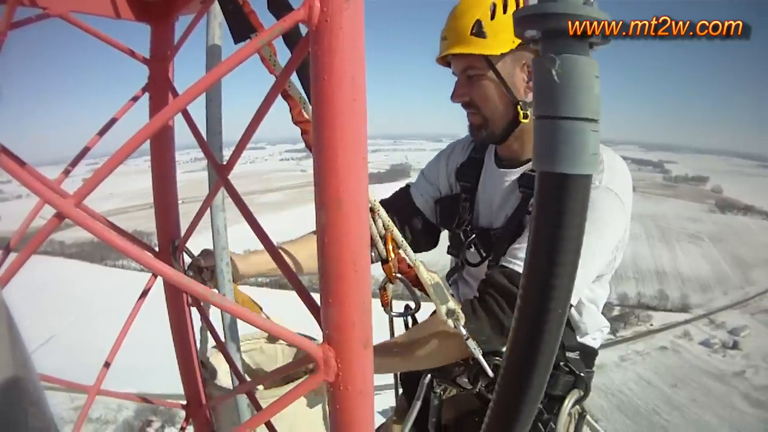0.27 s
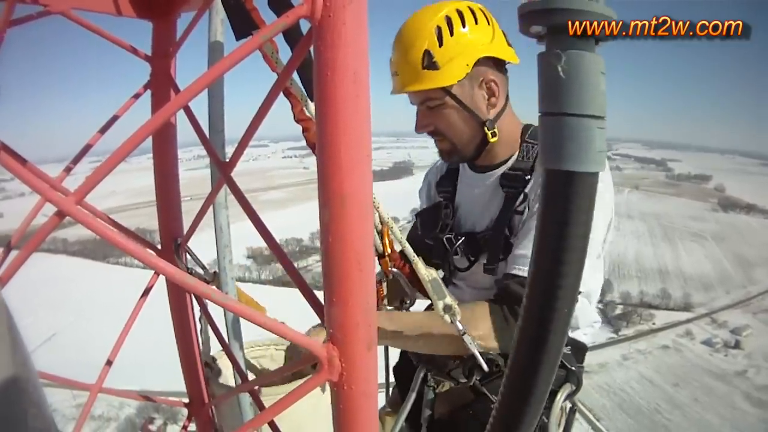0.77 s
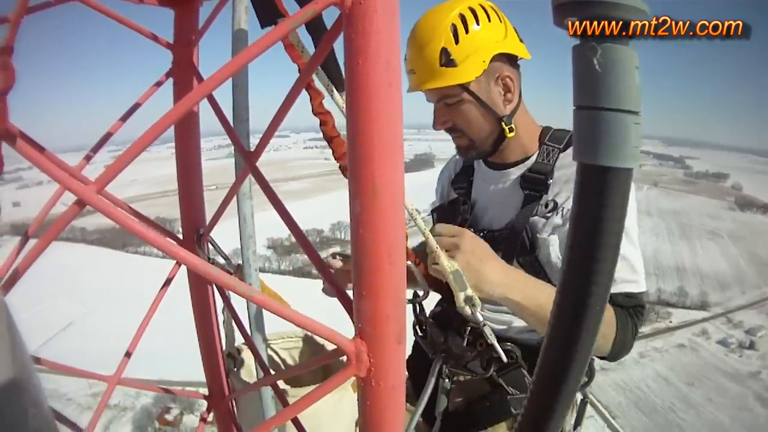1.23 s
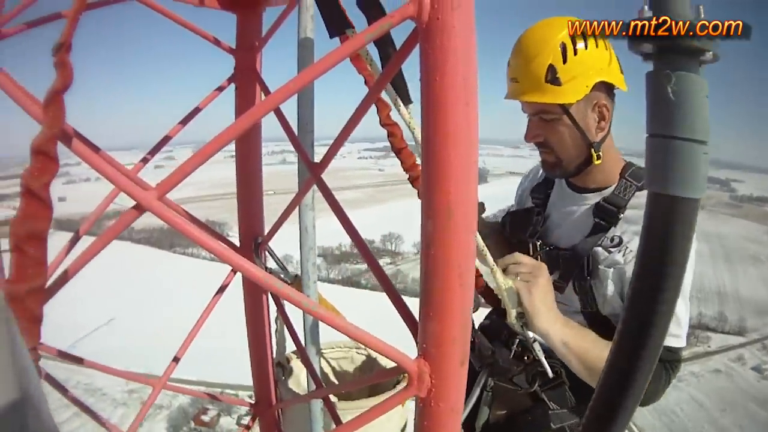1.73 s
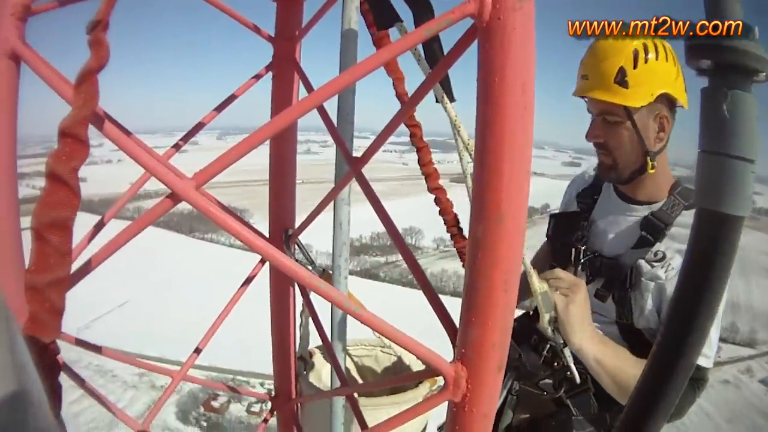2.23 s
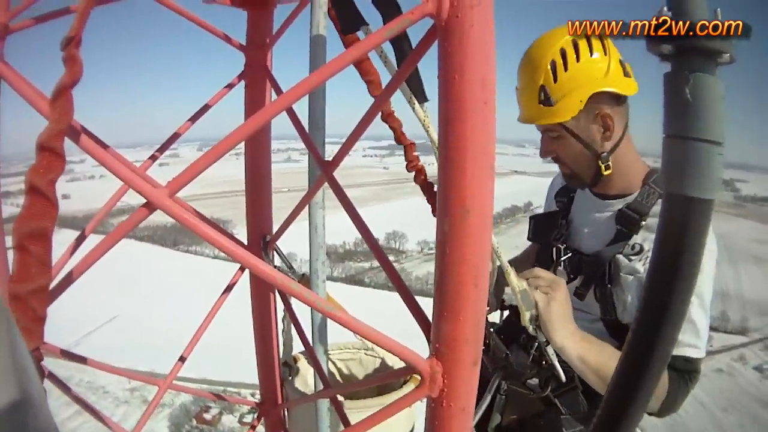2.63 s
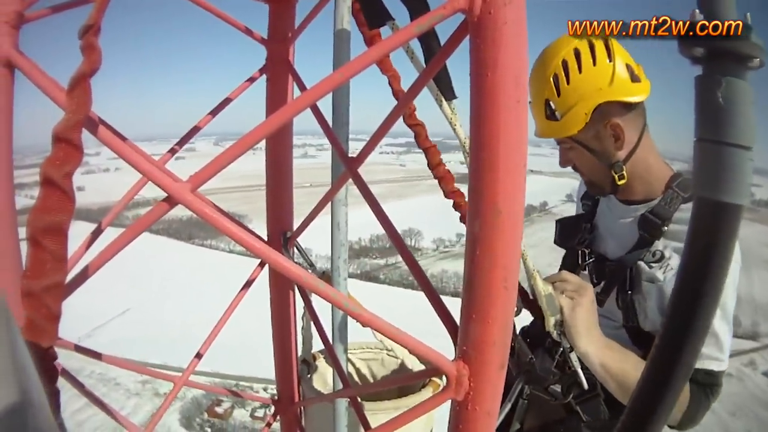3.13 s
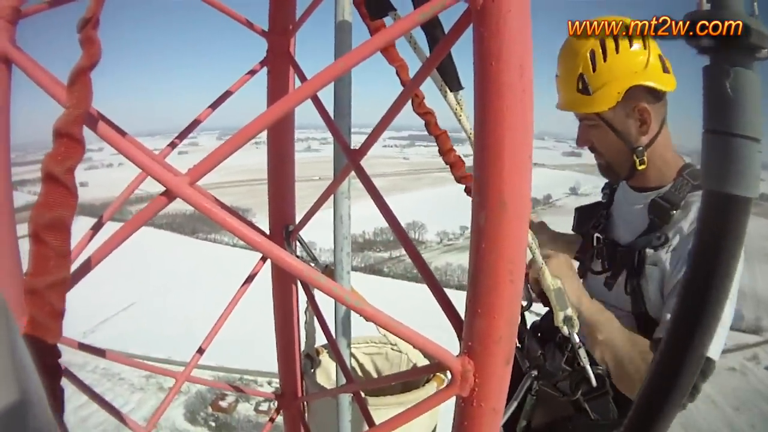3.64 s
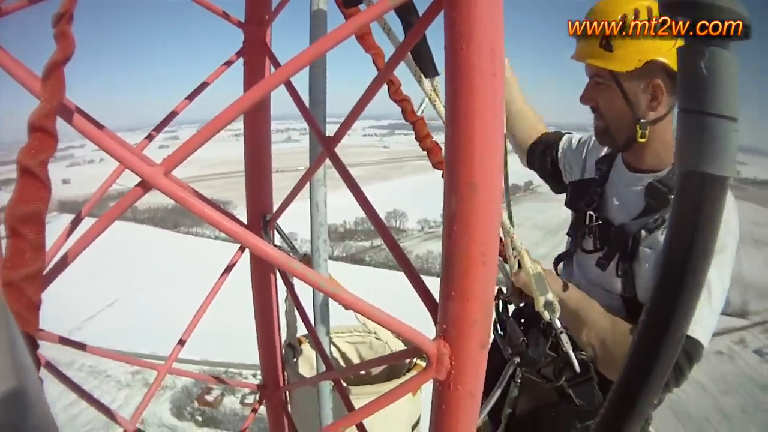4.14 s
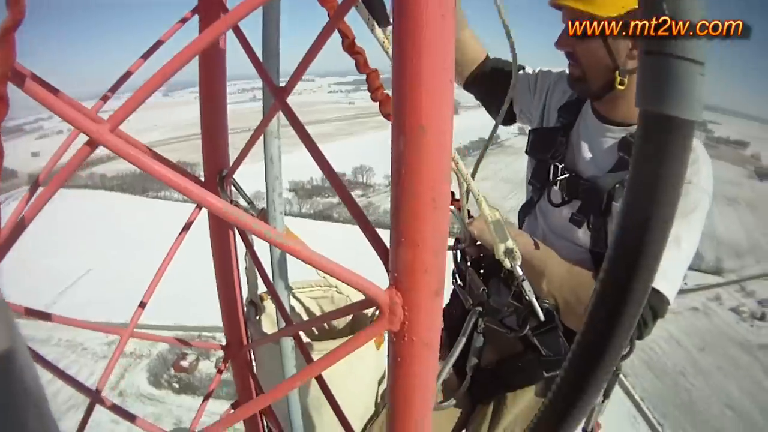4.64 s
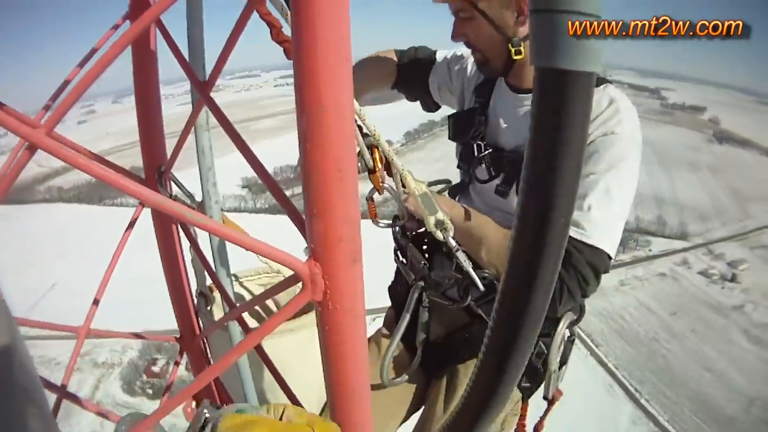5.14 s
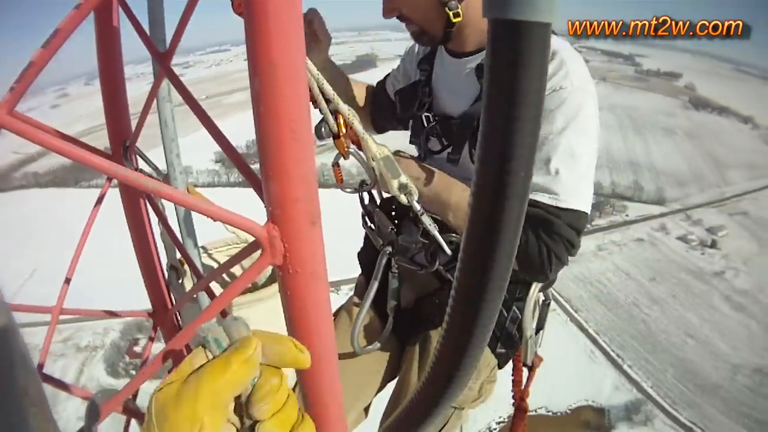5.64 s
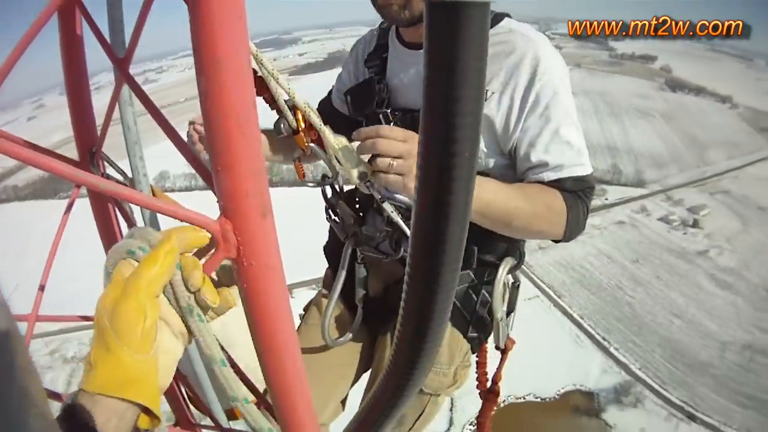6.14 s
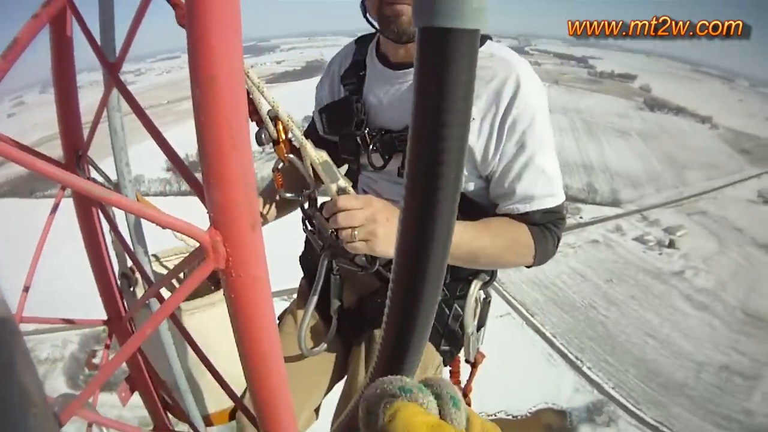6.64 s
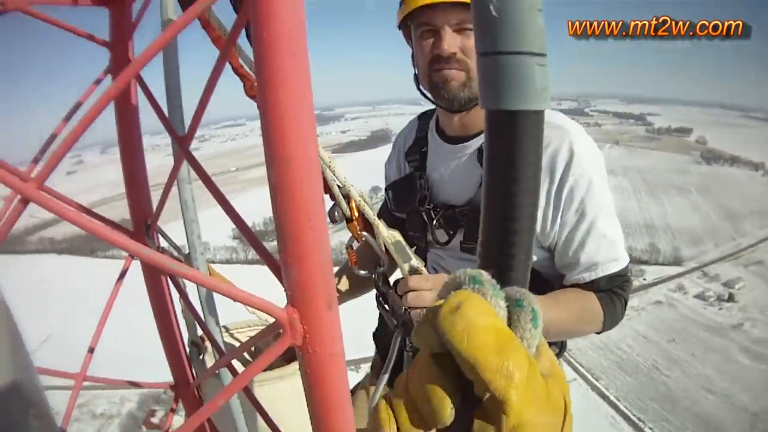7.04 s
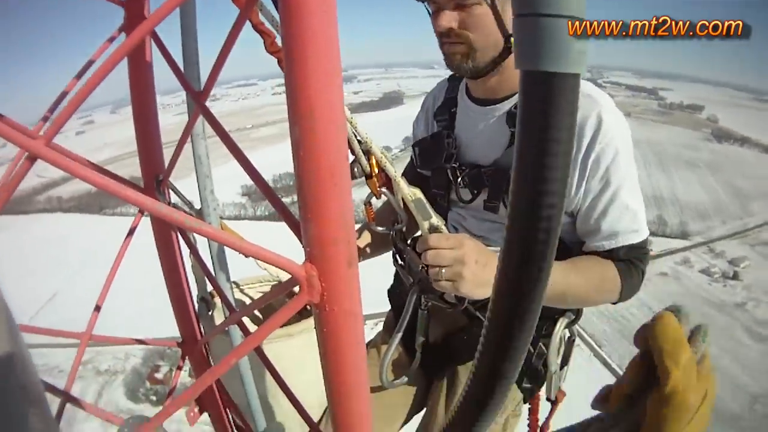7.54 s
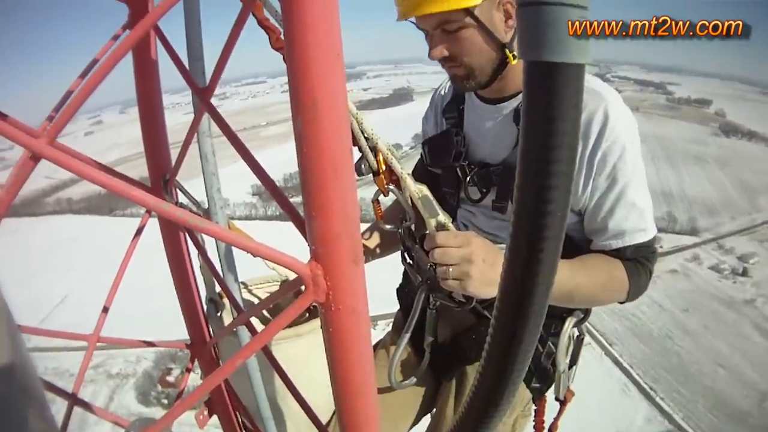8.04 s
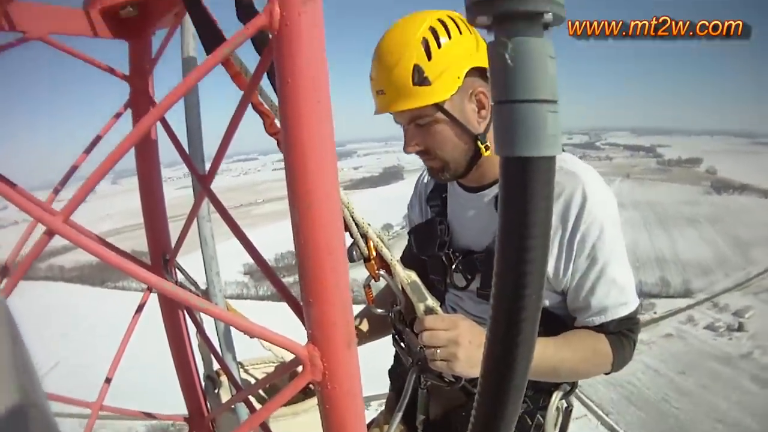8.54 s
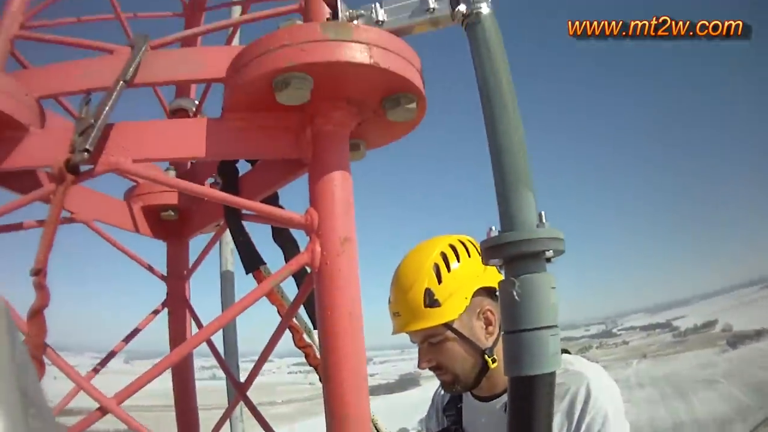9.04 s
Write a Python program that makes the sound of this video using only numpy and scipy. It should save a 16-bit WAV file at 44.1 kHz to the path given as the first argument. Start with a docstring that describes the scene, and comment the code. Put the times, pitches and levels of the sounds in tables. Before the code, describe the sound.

High on a steel mast, a climber rearranges gear at arm's length. A large hook clacks and rings at the start, a snap hook knocks a few seconds later, then carabiners clatter in a busy run with small ticks and rope rubbing. A spring gate snaps shut sharply near the end. A small enclosed microphone colours the clacks and picks up a dull wind rush, a hollow hum and faint hiss.

```python
"""High on a steel lattice mast, an arm's length from a climber rearranging his gear.
A scaffold hook, a snap hook and carabiners knock and ring, and a spring gate snaps shut: each contact
is a brief clack followed by the wavering modes of the metal. Hooks scrape, small parts tick, rope rubs.
The microphone is a small camera's, inside a closed case that colours the clacks; wind hums in the
hollow of the case and buffets it, over the camera's own hiss."""
import sys
import numpy as np
from scipy import signal
from scipy.fft import rfft, irfft, next_fast_len
from scipy.io import wavfile
from scipy.ndimage import uniform_filter1d

SR = 44100
rng = np.random.default_rng(int(sys.argv[2]) if len(sys.argv) > 2 else 0)


def master_out(mix):
    """Clip the mix to full scale and print it as 16-bit PCM to the path in sys.argv[1]."""
    frames = np.transpose(np.atleast_2d(mix))
    ceiling = np.clip(frames, -1, 1)
    pcm = np.round(ceiling * 32767).astype(np.int16)
    wavfile.write(sys.argv[1], SR, pcm)


N = 409688
TIME = np.arange(N) / SR

# Knocks on each piece (the carabiner's list also holds one clink at 5.05 s from another piece, here rung with
# the carabiner's modes): start_s, clack_db, low_mid_tint_db, treble_tint_db, relative_ring_db
SCAFFOLD_HOOK_HITS = [(0.0293, -49, -8, -5, -67), (0.1206, -47, 20, -9, -46), (0.139, -48, -2, -12, -35.5),
                      (0.1496, -35, 1, -7, -30.5), (0.1537, -23, -14, 9, -34), (0.5008, -53, 20, 16, -53)]
SNAP_HOOK_HITS = [(2.2273, -37, 1, -10, -46.5), (2.9188, -41.5, 7, -17, -64), (2.9322, -40, 6, -13, -48.5),
                  (3.5359, -41, 14, -9, -41), (3.5718, -16.5, -1.5, 0.5, -24), (3.68, -33.5, -2, 2, -49),
                  (3.7813, -30.5, 1, 0, -44.5), (4.1016, -53, 18, -3, -69), (4.1644, -35.5, 5, -19, -45.5),
                  (4.2268, -47, -5, -5, -70)]
CARABINER_HITS = [(4.9492, -46, 25, -2, -58), (5.024, -37, 17, -2, -42), (5.0515, -28, 7, -1.5, -36.5),
                  (5.2599, -46, 19, -7, -58), (5.454, -32, 10.5, 3, -44), (5.5882, -28, -10, -3, -37),
                  (5.5912, -19.5, 8, 7, -25.5), (5.6168, -28.5, 11, 4, -39), (5.6353, -17.5, 1, 3, -36.5),
                  (5.644, -21, 3, -4, -40), (5.6815, -34, 16, 0, -47), (5.7385, -27.5, -8, -11, -39),
                  (5.7663, -19, -2, 2.5, -30.5), (5.8381, -33, -4, -10, -52), (5.9938, -46, 3, -10, -54),
                  (6.0696, -43.5, -4, -9, -50), (6.1958, -32.5, -10, -10, -55), (6.2198, -35.5, 9, -1, -64),
                  (6.2397, -24.5, 0.5, 3.5, -43.5), (6.4343, -47, 21, 0, -61), (6.4896, -45, 4, 5, -67),
                  (6.5765, -30.5, 3, 3.5, -66), (6.6144, -31, 5, 3, -48), (6.67, -26, 5, 2, -45.5),
                  (6.8224, -28, 2, -4, -52), (6.8284, -29, 9, 4.5, -56), (6.8808, -38.5, 11, 2, -56),
                  (7.1896, -40.5, -5, -1.5, -64), (9.2763, -48.5, 12, 5, -67)]
GATE_HITS = [(7.5203, -53.5, -4, 1, -65), (7.5799, -15.5, 0, 10.9, -31.5)]  # eased open, then let snap shut
# Modes each piece rings with (the carabiner's list also holds the low 735 Hz ring of the steel mast it knocks
# against): pitch_hz, relative_db, t60_s
SCAFFOLD_HOOK_RING = [(950, -17, .6), (1530, -20, .5), (1978, -9, .7), (2061, -14, .6), (2330, -10, .5),
                      (2764, -8, .3), (2960, -2, .75), (3197, -8, .35), (3410, -7, .5), (3566, -2, .3),
                      (3768, -5, .6), (3832, 0, .7), (3908, -6, .5), (4215, -10, .6), (4290, -8, .7),
                      (5377, -14, .6), (5987, -15, .55), (6472, -3, .45), (7657, -8, .32), (9070, -13, .42),
                      (9357, -11, .3), (9523, -13, .38), (11260, -17, .3)]
SNAP_HOOK_RING = [(2293, -13, .65), (2600, -17, .5), (2955, -7, .85), (3030, -11, .7), (3391, -10, .55),
                  (3623, -2, .36), (3774, -4, .42), (3860, -5, .38), (4086, -8, .55), (4184, -5, .45),
                  (4215, -4, .75), (4280, -1, 1.05), (4818, -15, .5), (6218, -7, .38), (6363, -10, .5),
                  (6589, 0, .3), (6735, -9, .45), (6837, -9, .45), (6950, -9, .35), (7750, -17, .4),
                  (8053, -9, .3), (8950, -18, .3), (10210, -18, .32)]
CARABINER_RING = [(410, -18, .3), (735, -9, 1.1), (2016, -13, .6), (2069, -13, .6), (2277, -13, .5),
                  (2379, -6, .6), (2476, -10, .3), (2742, -9, .45), (2927, -10, .5), (3105, -10, .25),
                  (3250, -9, .45), (3383, -2, .55), (3601, 0, .55), (3776, -4, .4), (3940, 0, .48),
                  (4165, -6, .5), (4376, -11, .4), (4805, -9, .4), (5567, -13, .4), (6217, -13, .35),
                  (6595, -5, .33), (7054, -13, .3), (8026, -13, .28)]
GATE_RING = [(2950, -18, 0.64), (4200, -17, 0.67), (3500, -18, .2), (4000, 0, 0.12), (3930, -9, 0.26),
             (6940, -6, .05), (7600, -13, 0.092), (11200, 12, 0.036)]
# Spectrum of a clack heard through the case: frequency_hz, relative_db
CLACK_SPECTRUM = [(60, -54), (400, -11), (750, -7), (1300, -36.5), (1750, -15.5), (2400, -1), (3300, -7),
                  (3950, 5.5), (4500, -6), (5200, -13), (6700, -4.5), (8000, -12.5), (9800, -23.5),
                  (12000, -24.5), (15500, -41)]
# Sharp resonances of the case: centre_hz, width_hz, gain_db
CASE_RESONANCES = [(2660, 73, 5), (4040, 87, 1.5), (6690, 100, 7), (11040, 340, -2)]
# Faint crowd of overtones from the linked gear: frequency_hz, relative_db
JANGLE_SPECTRUM = [(1200, -7), (2000, -12.5), (2600, -1.5), (4100, 6.5), (4900, -11.5), (6600, -8.5),
                   (9000, -16), (14000, -29)]
# Metal sliding on metal: start_s, length_s, start_hz, end_hz, width_hz, relative_db
HOOK_SLIDES = [(3.746, 0.041, 1480, 2900, 87, -38), (3.775, 0.011, 2664, 2880, 83, -17),
               (5.976, 0.014, 2420, 2600, 200, -39), (6.811, 0.01, 2330, 3570, 603, -33)]
# Spells of sorting small parts: start_s, end_s, ticks_per_s, level_db
SORTING_SPELLS = [(0, 1.201, 4, -56), (5.402, 6.949, 14, -49)]
# Wind rush heard through the case: frequency_hz, relative_db
RUSH_SPECTRUM = [(15, -71), (25, -17), (48, -28), (75, -13.5), (102, -18), (195, -10.5), (240, -13),
                 (316, -10.5), (350, -10), (394, -8), (595, -2), (743, -8), (810, -11), (1050, -20.5),
                 (1500, -29), (1950, -54), (3300, -120)]
# Pitch of the hum in the hollow of the case: time_s, pitch_hz
HUM_PITCH_CURVE = [(0, 570), (4.4, 590.6), (5.5, 560.7), (9.29, 549.5)]
# Strength of that hum: time_s, relative_db
HUM_LEVEL_CURVE = [(0, -55), (1.5, -61), (2.85, -51), (4.05, -49), (4.8, -56), (5.5, -44), (6.0, -56),
                   (6.8, -42), (7.15, -57), (7.45, -42.5), (7.7, -55), (8.4, -44), (9.29, -55.5)]
# Gusts against the case: middle_s, length_s, relative_peak_db
WIND_GUSTS = [(1.05, 1.6, -61.5), (6.23, .14, -58), (6.65, 0.58, -57), (8.92, 0.44, -60.5)]
# Strokes of rope and webbing: middle_s, length_s, peak_db
ROPE_RUBS = [(1.02, 0.44, -75), (4.53, 0.29, -64), (4.95, 0.23, -58), (5.65, 0.74, -48.5), (6.45, .9, -65)]
# Spectra of buffeting, rope, shared hiss and left-right hiss: frequency_hz, relative_db
BUFFET_SPECTRUM = [(12, -12), (45, -1.5), (110, 1.0), (250, -1.0), (900, -68)]
ROPE_SPECTRUM = [(900, -29.5), (1700, 0.5), (2500, 2.5), (4000, -1.5), (5200, -14), (7000, -9.5),
                 (12000, -32)]
HISS_SPECTRUM = [(760, -17.5), (1300, -3.5), (1500, -4.5), (2550, -3), (3310, -7.5), (5730, -8.5),
                 (10500, -8), (11600, -7.5), (15500, -11.5)]
SIDE_HISS_SPECTRUM = [(600, -40), (2000, -19.5), (6000, 2.5), (12000, 2.5), (15500, 2.5)]


def gear(knocks, modes, ring_db, jangle_db, jangle_t60, chatter_s, lowest_hz, already_ringing_db=-120):
    """Knocked steel at arm's length clacks and rings; gripped, it rings quietly, briefly, less purely."""
    hard_knock_db, chatter_step_db = -26.5, 12.5
    scatter_db, wash_db, grip_t60 = 3, -10, 1.0
    out = np.zeros(N)
    t = np.arange(int(.9 * SR)) / SR
    hz, db, t60 = with_jangle(modes, jangle_db, jangle_t60)
    partials = swinging_partials(t, hz, t60)
    # an earlier touch leaves only the long modes sounding
    add(out, 0, undb(already_ringing_db) * undb(db) @ (partials * (t60[:, None] > .5)))
    for start_s, clack_db, low_mid_db, treble_db, knock_ring_db in knocks:
        grip = np.clip((-35 - knock_ring_db) / 20, 0, 1)  # 0 hanging free, 1 held tight
        # every point of contact weights the modes differently
        mode_db = db * (1 - .7 * grip) + (.3 + grip) * scatter_db * rng.standard_normal(len(hz))
        weights = undb(mode_db) * rng.choice([-1, 1], len(hz))
        # overtones too crowded to tell apart blend into a wash
        wash = unit(colour(rng.standard_normal(len(t)), JANGLE_SPECTRUM)) * fade(t, jangle_t60)
        ring = weights @ partials / np.sqrt(np.sum(weights ** 2) / 2) + undb(wash_db) * wash
        add(out, start_s, undb(knock_ring_db + ring_db) * ring * fade(grip * t, grip_t60))
        # hard knocks chatter longer
        clack_t60 = chatter_s * (1.5 + max(clack_db - hard_knock_db, 0) / chatter_step_db)
        add(out, start_s, undb(clack_db) * clack(low_mid_db, treble_db, clack_t60))
    # small metal parts radiate no bass
    return signal.sosfilt(signal.butter(2, lowest_hz, "high", fs=SR, output="sos"), out)


def clack(low_mid_db, treble_db, t60, rattle_db=-22, rattle_t60=0.089):
    """Metal chatters on metal for an instant and the case around the microphone rattles on briefly."""
    t = np.arange(SR // 6) / SR
    burst = rng.standard_normal(len(t)) * (fade(t, t60) + undb(rattle_db) * fade(t, rattle_t60))
    hz, db = np.transpose(CLACK_SPECTRUM)
    # each knock has its own low-middle and treble tint
    tint_db = [0, low_mid_db, 0, 0, treble_db, 2.08 * treble_db]
    db = db + np.interp(hz, [1000, 2300, 3500, 5200, 6700, 12000], tint_db)
    sound = colour(burst, np.transpose([hz, db]), CASE_RESONANCES)
    return sound / np.std(sound[:int(.006 * SR)])  # the first 6 ms set the level


def swinging_partials(t, hz, t60, flutter_depth=0.47, waver_rad_per_khz=0.22):
    """A swinging piece turns its faces to and fro, so each dying partial wavers in level and phase."""
    flutter_hz, offset = rng.uniform([4, 0], [22, 2 * np.pi], (len(hz), 2)).T
    turn = np.float32(np.outer(2 * np.pi * flutter_hz, t) + offset[:, None])
    waver = waver_rad_per_khz * hz[:, None] / 1000 * np.sin(np.sqrt(2) * turn)
    tones = np.sin(np.float32(np.outer(2 * np.pi * hz, t) + waver))
    return tones * (1 + flutter_depth * np.sin(turn)) * fade(t, t60[:, None])


def with_jangle(modes, jangle_db, jangle_t60, count=110):
    """The linked gear adds many weak modes to a piece's own; the high ones die sooner."""
    hz = np.geomspace(1600, 13000, count) * np.exp(rng.uniform(-.01, .01, count))
    db = np.interp(hz, *np.transpose(JANGLE_SPECTRUM)) + jangle_db
    t60 = jangle_t60 * (3500 / hz) ** 0.3
    return np.vstack([modes, np.transpose([hz, db, t60])]).T


def scrapes():
    """A hook slides and chirps upward, growing louder until it seats."""
    out = np.zeros(N)
    for start_s, length_s, start_hz, end_hz, width_hz, db in HOOK_SLIDES:
        travel = np.linspace(0, 1, int(length_s * SR))
        hz = start_hz + (end_hz - start_hz) * travel ** 2
        friction = unit(uniform_filter1d(rng.standard_normal(len(travel)), int(SR / width_hz / 2)))
        swell = travel ** 2 * signal.windows.tukey(len(travel), .2)
        add(out, start_s, undb(db) * swell * friction * np.sin(2 * np.pi * np.cumsum(hz) / SR))
    return out


def ticks(spread_db=3):
    """Buckles and gates touch at random, too softly to ring."""
    out = np.zeros(N)
    for start_s, end_s, ticks_per_s, db in SORTING_SPELLS:
        length_s = end_s - start_s
        for when, strength in rng.random((int(length_s * ticks_per_s), 2)):
            tick = clack(low_mid_db=9, treble_db=-3, t60=0.022)
            add(out, start_s + when * length_s, undb(db + spread_db * (2 * strength - 1)) * tick)
    return out


def rope(grain_db=2.0, handling_db=-66):
    """Fibres catch and slip in tiny uneven grains: strokes of rope above steady light handling."""
    grains = rng.standard_normal(N) * undb(grain_db * drift(90))
    return unit(colour(grains, ROPE_SPECTRUM)) * swells(ROPE_RUBS, handling_db)


def wind(rush_db=-46.5, hum_trim_db=-3, buffet_trim_db=2, drone_db=-73):
    """Wind on the camera case: a dull rush, a hum in its hollow, low buffeting and a faint drone."""
    rush = unit(colour(rng.standard_normal(N), RUSH_SPECTRUM)) * undb(rush_db + .5 * drift(4.1))
    hum_hz = np.interp(TIME, *np.transpose(HUM_PITCH_CURVE))
    hum_db = np.interp(TIME, *np.transpose(HUM_LEVEL_CURVE)) + hum_trim_db
    hum = narrow_tone(hum_hz, width_hz=9) * undb(hum_db)
    gusting = swells(WIND_GUSTS, base_db=-69) * undb(buffet_trim_db)
    buffet = unit(colour(rng.standard_normal(N), BUFFET_SPECTRUM)) * gusting
    drone = narrow_tone(hz=76, width_hz=2.8) * undb(drone_db)
    return rush + hum + buffet + drone


def narrow_tone(hz, width_hz):
    """A tone whose strength and phase wander, like a resonance driven by turbulence."""
    phase = 2 * np.pi * np.cumsum(hz * np.ones(N)) / SR
    return unit(drift(width_hz) * np.cos(phase) + drift(width_hz) * np.sin(phase))


def swells(events, base_db):
    """Gain that rests at base_db; each event adds a smooth rise and fall."""
    return undb(base_db) + sum(undb(db) * np.cos(np.pi * np.clip((TIME - s) / length_s, -.5, .5)) ** 2
                               for s, length_s, db in events)


def drift(rate_hz):
    """Smooth random motion of rms 1, about rate_hz fast."""
    hz = np.arange(N // 2 + 1) * SR / N
    return unit(irfft(rfft(rng.standard_normal(N)) / (1 + (hz / rate_hz) ** 2), N))


def colour(x, spectrum, peaks=()):
    """Filter by a spectrum outline plus resonant bumps; causal, so attacks stay sharp."""
    size = next_fast_len(len(x) + 2048) * 2
    hz = np.arange(size // 2 + 1) * SR / size + 1
    outline_hz, outline_db = np.transpose(spectrum)
    db = np.interp(np.log(hz), np.log(outline_hz), outline_db)
    db += sum(gain_db / (1 + (2 * (hz - centre) / width) ** 2) for centre, width, gain_db in peaks)
    # folding the cepstrum gives minimum phase
    cepstrum = irfft(np.log(undb(db)), size)
    cepstrum[1:size // 2] *= 2
    cepstrum[size // 2 + 1:] = 0
    return irfft(rfft(x, size) * np.exp(rfft(cepstrum)), size)[:len(x)]


def fade(t, t60):
    """Exponential decay of 60 dB in t60 seconds."""
    return np.exp(-np.log(1000) * t / np.maximum(t60, 1e-3))


def add(track, start_s, sound):
    """Mix a sound into the track from start_s on."""
    start = int(np.clip(start_s * SR, 0, N - 1))
    track[start:start + len(sound)] += sound[:N - start]


def undb(db):
    """Decibels to gain."""
    return 10 ** (np.asarray(db) / 20)


def unit(x):
    """Scale to rms 1."""
    return x / np.sqrt(np.mean(x ** 2) + 1e-20)


def scene():
    """All sources reach the microphone through the case, the same on both channels."""
    metal = gear(SCAFFOLD_HOOK_HITS, SCAFFOLD_HOOK_RING, ring_db=-4, jangle_db=-15.5, jangle_t60=0.5,
                 chatter_s=0.037, lowest_hz=300, already_ringing_db=-53)
    metal += gear(SNAP_HOOK_HITS, SNAP_HOOK_RING, ring_db=-2, jangle_db=-15, jangle_t60=0.61,
                  chatter_s=0.025, lowest_hz=304)
    metal += gear(CARABINER_HITS, CARABINER_RING, ring_db=-4, jangle_db=-18, jangle_t60=0.74,
                  chatter_s=0.025, lowest_hz=230)
    metal += gear(GATE_HITS, GATE_RING, ring_db=2.5, jangle_db=-28, jangle_t60=0.17,
                  chatter_s=0.0078, lowest_hz=800)
    return np.tile(metal + ticks() + scrapes() + wind() + rope(), (2, 1))


def record(dry, hiss_db=-58.5, side_db=-65, whine_db=-72, whine_hz=11990, top_hz=15600):
    """Microphone hiss and a thin electronic whine join the sound, and the very top is cut."""
    hiss = unit(colour(rng.standard_normal(N), HISS_SPECTRUM)) * undb(hiss_db)
    # a faint, high hiss spreads slightly between left and right
    side = unit(colour(rng.standard_normal(N), SIDE_HISS_SPECTRUM)) * undb(side_db)
    whine = undb(whine_db) * (np.sin(2 * np.pi * whine_hz * TIME) + .4 * narrow_tone(whine_hz, 15))
    sound = dry + hiss + whine + side * np.array([[1], [-1]])
    return signal.sosfilt(signal.ellip(8, .2, 70, top_hz, fs=SR, output="sos"), sound)


dry = scene()
out = record(dry)
master_out(out)
```